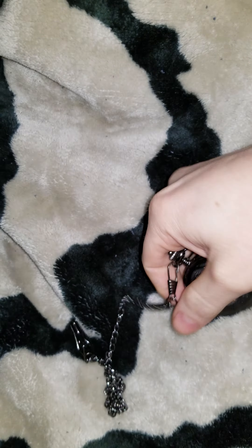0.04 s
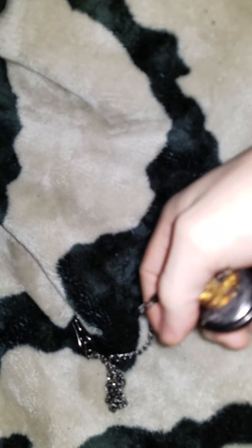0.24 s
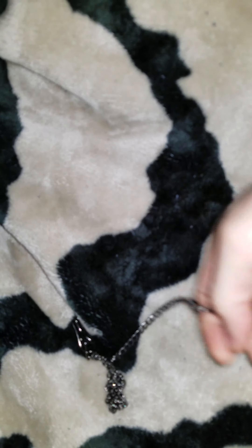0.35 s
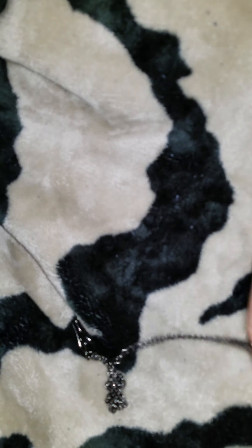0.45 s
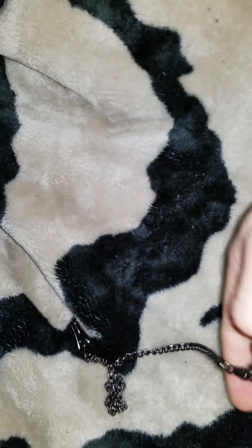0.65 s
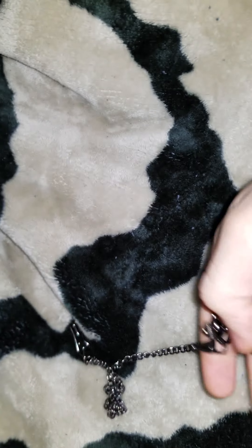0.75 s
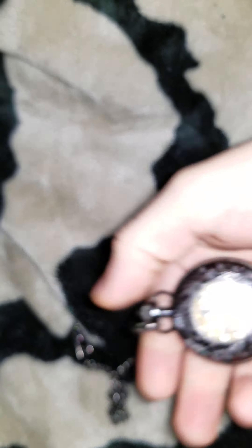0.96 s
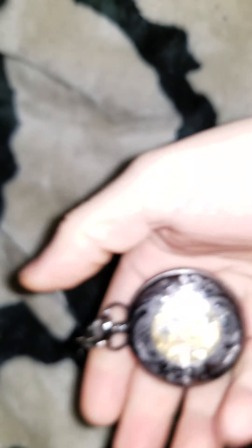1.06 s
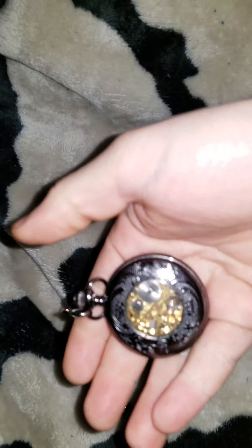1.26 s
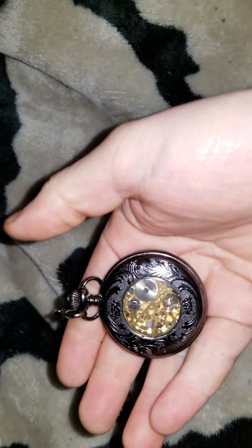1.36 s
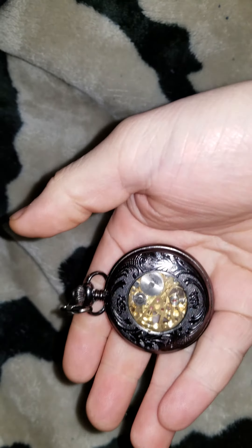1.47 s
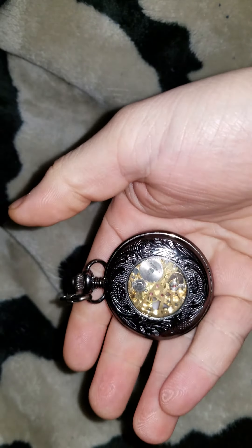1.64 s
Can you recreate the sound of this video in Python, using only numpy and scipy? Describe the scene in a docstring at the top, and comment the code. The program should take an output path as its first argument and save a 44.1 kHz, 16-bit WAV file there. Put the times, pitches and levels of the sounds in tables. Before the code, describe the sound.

Short, bright clicks of a chain against a handled pocket watch, over soft brushing and hiss.

```python
"""Over a steady hiss with faint whining tones, a hand brushes a fleece blanket, close to the microphone.
At 0.2 s it lifts a metal pocket watch with soft bumps and thuds and turns it over. Bow and chain knock
on the case in short bright clicks, the chain slides, and a small room answers. At 0.62 s one link rings
on briefly amid a flurry of clicks. After 0.8 s only the brushing and a few bumps stir over the hiss."""
import sys
import numpy as np
from scipy import signal
from scipy.fft import rfft, irfft
from scipy.io import wavfile

SR = 44100
rng = np.random.default_rng(int(sys.argv[2]) if len(sys.argv) > 2 else 0)


def to_wav(s):
    """Save 16-bit WAV."""
    ch = np.atleast_2d(s).T  # columns
    pcm = np.round(np.clip(ch, -1, 1) * 32767)  # PCM
    wavfile.write(sys.argv[1], SR, pcm.astype(np.int16))


N = 74970
T, FREQS = np.arange(N) / SR, np.fft.rfftfreq(N, 1 / SR)

# Stereo image of the noises. Each row: frequency in Hz, left-right correlation.
LIKENESS = [(30, 0), (130, 1), (300, 0.79), (700, 0.407), (1700, 0.058), (3000, 0), (4300, 0.21),
            (12000, 0)]
# Colour of the hiss. Each row: frequency in Hz, relative level in dB.
HISS_COLOUR = [(25, -8), (60, 2), (130, -1), (280, -4), (450, -14.5), (800, -19.5), (1200, -25), (1700, -9),
               (2400, -14), (2950, -14.5), (3280, -5), (3550, -7.5), (4250, 1.5), (4450, -16.5),
               (4720, -3.5), (5050, -13.5), (6000, -21), (7000, -16.5), (8400, -39), (12000, -30),
               (16000, -35)]
# Where the hiss sits. Each row: frequency in Hz, left over right in dB.
HISS_PAN = [(40, 3), (150, 2.5), (600, 8), (1200, 1.5), (2400, -7.5), (4200, -1.5), (5500, -1), (7000, 8.5),
            (12000, 0)]
# Faint whines in the hiss. Each row: pitch in Hz, level in dB.
WHINES = [(3575, -67.5), (3855, -66), (3970, -70), (4045, -83), (4080, -73.5), (4170, -68), (4206, -70),
          (4234, -71.5), (4262, -63.5), (4377, -64), (4439, -91), (4586, -68.5), (4657, -71.5), (4711, -66)]
HISS_DB, WHINE_WIDTH_HZ = -56.5, 17
HUM_HZ, HUM_DB, HUM_WIDTH_HZ = 118.7, -66.5, 16

# The hand's stroke on the fleece. Each row: time in seconds, level in dB, swish centre and width in Hz.
BRUSH_STROKE = [(0, -58, 1590, 338), (.07, -63, 1596, 300.3), (.12, -61, 1575, 326.8),
                (.165, -56, 1517, 556), (.25, -56.5, 1609, 478), (.31, -56, 1587, 403.3),
                (.37, -58.5, 1699, 399.6), (.48, -76, 1824, 258.1), (.75, -78.5, 1770, 220.2),
                (.97, -63.5, 1776, 198.1), (1.07, -65, 1747, 202.1), (1.14, -59, 1788, 240),
                (1.22, -57, 1764, 282.1), (1.32, -62, 1757, 218.8), (1.42, -70.5, 1733, 200),
                (1.58, -64, 1789, 201.4), (1.7, -72, 1794, 199)]
# The dry rub under the swish. Each row: frequency in Hz, relative level in dB.
RUSTLE_COLOUR = [(100, -7), (300, -1), (750, -3.5), (1100, -6), (1450, 3), (2200, -2), (5000, -7),
                 (8000, -32), (16000, -38)]
SWISH_WIDTH_HZ, BRUSH_REST_DB = 330, -63.5
RUSTLE_DB, RUSTLE_DB_PER_DB = -74.5, 2.4

# Soft bumps of the hand. Each row: centre in seconds, level in dB, half length in seconds.
BUMPS = [(0.199, -48.5, 0.018), (0.232, -52, 0.026), (0.316, -55, .012), (0.405, -56, 0.052),
         (0.729, -52, 0.012), (0.767, -61, .029), (.836, -56.5, 0.038), (1.648, -62.5, .018)]
# Their rumble. Each row: frequency in Hz, relative level in dB.
BUMP_COLOUR = [(20, -10), (55, 2.5), (85, -3.5), (140, -14), (300, -14.5), (800, -70.5), (4000, -78.5)]
# Thuds of hand and watch. Each row: centre in seconds, envelope level in dB, pitch in Hz.
THUDS = [(.196, -41, 61), (.309, -39, 63.1), (0.711, -45, 64), (.729, -46, 55.6)]

# Metal knocks on the case, coloured by the point of contact. Each row: start in seconds, level in dB,
# boosts in dB for low, clink, snap, bright, treble and top, then left over right in dB.
KNOCKS = [(.2408, -34.5, 13, 8, 9, 0, 3, 5, -5), (.3002, -41.5, -8, 6, 5, 1, -5, -2, -5),
          (.3064, -56, -7, -6, 4.5, -12, -4, -2, -2), (.3573, -21, 2, 6.5, 6.5, -0.5, 3, 11, 0),
          (.3801, -42, -14, 14, 7.5, -3, 5, 8, 3), (.5159, -58.5, 3, -3.5, -2, -1, 5.5, 7, 0),
          (.5549, -58.5, 0, -7, 1.5, -18, 9, -2, -8), (.5987, -48.5, 2, 3, 5.5, -2, 2, -11, -8),
          (.6176, -40.5, -21, 16.5, -7, 12, -12.5, 8, 1), (.6203, -34, -23, -11.5, 4, 1, -13.5, -5.5, -2.5),
          (.6218, -36, -27, 4, 1.5, -0.5, -4.5, 3, 3.5), (.6423, -45.5, 6.5, -4, -12, -6, -9.5, 2.5, 3.5),
          (.6483, -37.5, -1, 15, 0, 6.5, 2.5, -6.5, 7.5), (.6514, -28.5, 3.5, 0.5, -6, 2.5, 15.5, 4.5, -8),
          (.6597, -42, -8, -17, -11, -7, 11.5, 14, 0.5),
          (.6867, -55, -0.5, -2.5, -0.5, -4.5, -13.5, 0, -13.5), (.6921, -48, 1.5, -2.5, 0, -4, 2, 0, -7.5),
          (.7065, -49.5, 0, 20.5, -9, 3, 6, 8, 1), (.7167, -44, -3, 4, 8, 1, -13, 2, -0.5),
          (.7227, -51.5, 3.5, -6, 9, 4, -4, -10, 2), (.7661, -45, 3, -6, -10, 5, 7.5, 8, -2)]
# The bands of that colour, in Hz: low, clink, snap, ping, bright, treble, top.
BANDS_HZ = [2150, 2800, 4200, 5700, 7200, 11500, 14500]
# The crack of contact. Each row: frequency in Hz, gain in dB.
CRACK_COLOUR = [(150, -48), (600, -43), (1000, -32), (2500, -21.5), (4200, -33.5), (6000, -9.5), (8000, 1),
                (9300, -12.5), (10300, -0.5), (12000, -12), (16000, 0.5)]
# Modes of the hand-damped case. Each row: pitch in Hz, left and right level in dB, T60 in seconds.
CASE_MODES = [(2146, -15.4, -14.0, 0.0112), (2775, -10.9, -12.4, 0.008), (3264, -18.9, -17.0, 0.0084),
              (4137, -9.3, -8.8, 0.0079), (4848, -10.4, -7.1, 0.0091), (5716, 3.2, 8.7, 0.0089),
              (6775, -8.1, -4.6, 0.0092), (7279, 1.3, -6.2, 0.0069), (8335, -9.9, -4.9, 0.0085),
              (10670, -9.8, -15.3, 0.0097), (11216, 0.1, -4.4, 0.0083), (11625, -2.6, -5.1, 0.0084),
              (12366, 6.2, 3.4, 0.0061), (13201, -12.7, -7.1, 0.0086), (14287, -8.4, 3.3, 0.0068),
              (14679, -12.1, -2.9, 0.0082), (15445, -0.6, -8.0, 0.0072)]
ATTACK_S, CONTACT_S, CRACK_DECAY_S, CRACK_DB = .0001, .000391, .0013, 2
MODE_SCATTER_DB, GRIP_DETUNE = 3.5, .005  # blow-to-blow spread of level and of pitch (a fraction)
CASE_LOW_HZ = 1000  # the small case radiates little below this

# Colour of the room's tail. Each row: frequency in Hz, relative level in dB.
ROOM_COLOUR = [(500, 10), (1200, 17.5), (3000, 5), (6000, -14), (9000, -0.5), (12000, -3), (16000, -12.5)]
ROOM_DB, ROOM_T60_S, ROOM_DELAY_S, ROOM_BUILD_S = -14.5, .29, .0078, .0047

# The chain's slide along the case. Each row: time in seconds, tick strength in dB.
CHAIN_SLIDE = [(0, -78), (.21, -82.5), (.28, -63.5), (.35, -75.5), (.378, -49.5), (.39, -57), (.41, -63),
               (.48, -71.5), (.6, -74.5), (.67, -59.5), (.74, -78.5), (.8, -77.5), (.9, -92.5),
               (1.7, -96.5)]
# A link swings free until it lands. Each row: start in seconds, level in dB, free time in seconds.
LINK_SWINGS = [(.6206, -31, .0092)]
# The link's ring. Each row: pitch in Hz, relative level in dB, T60 in seconds.
LINK_MODES = [(5790, -12, .025), (7430, -5, .022), (12670, 0, .09)]


def from_db(db):
    """Decibels to gain."""
    return 10 ** (np.asarray(db) / 20)


def rms_one(x):
    """Scale to unit level."""
    return x / np.sqrt(np.mean(x ** 2) + 1e-20)


def in_time(rows):
    """Each column of an automation curve, sample by sample."""
    times, *columns = np.transpose(rows)
    return [np.interp(T, times, column) for column in columns]


def over_hz(points):
    """An EQ curve joined on a log frequency axis."""
    hz, value = np.transpose(points)
    return np.interp(np.log(FREQS + 1), np.log(hz), value)


def panned(pan_db):
    """Left and right gains of constant power; positive leans left."""
    gains = from_db(np.array([[.5], [-.5]]) * pan_db)
    return gains / np.sqrt(np.mean(gains ** 2, axis=0))


def decay(age, t60):
    """A fade of 60 dB every t60 seconds."""
    return np.exp(-np.log(1000) * age / t60)


def noise(gain):
    """Unit-level stereo noise of a given colour, nearly mono in the bass."""
    mid, side = rfft(rng.standard_normal((2, N)))
    alike = np.clip(over_hz(LIKENESS), -.99, .99)
    stereo = np.sqrt(1 + alike) * mid + np.sqrt(1 - alike) * side * [[1], [-1]]
    return rms_one(irfft(gain * stereo, N))


def noise_band(hz, half_width_hz):
    """A narrow band of noise, heard as a wavering tone."""
    return noise(1 / (1 + ((FREQS - hz) / half_width_hz) ** 2))


def background():
    """The bed: room hiss with a low hum and a cluster of wavering whines."""
    hiss = from_db(HISS_DB) * noise(from_db(over_hz(HISS_COLOUR)) * panned(over_hz(HISS_PAN)))
    hum = from_db(HUM_DB) * noise_band(HUM_HZ, HUM_WIDTH_HZ)
    whines = sum(from_db(db) * noise_band(hz, WHINE_WIDTH_HZ) for hz, db in WHINES)
    return hiss + hum + whines


def brush():
    """Hand on fleece: a hollow swish, over a dry rustle that grows with pressure."""
    level_db, centre_hz, width_hz = in_time(BRUSH_STROKE)
    flutter = noise_band(0, SWISH_WIDTH_HZ / 2)
    playhead = np.cumsum(width_hz / SWISH_WIDTH_HZ)  # faster flutter widens the swish
    grain = np.array([np.interp(playhead, np.arange(N), side, period=N) for side in flutter])
    swish = rms_one(grain * np.cos(2 * np.pi * np.cumsum(centre_hz) / SR))
    pressure_db = level_db - BRUSH_REST_DB
    rustle = from_db(RUSTLE_DB + RUSTLE_DB_PER_DB * pressure_db) * noise(from_db(over_hz(RUSTLE_COLOUR)))
    return from_db(level_db) * swish * panned(pan_db=-7.5) + rustle


def bumps():
    """Dull swells of handling rumble, mostly on the left."""
    swell = sum(from_db(db) * np.exp(-.5 * ((T - s) / half_s) ** 2) for s, db, half_s in BUMPS)
    return swell * noise(from_db(over_hz(BUMP_COLOUR))) * panned(pan_db=14)


def thuds(half_length_cycles=.46):
    """Hand and watch give a padded push and rebound, too damped to ring."""
    out = np.zeros(N)
    for s, db, hz in THUDS:
        cycles = (T - s) * hz
        out += from_db(db) * np.exp(-.5 * (cycles / half_length_cycles) ** 2) * np.sin(2 * np.pi * cycles)
    return out * panned(pan_db=22)


def minimum_phase(gain):
    """The tightest impulse response with this spectrum."""
    cepstrum = irfft(np.log(gain), N)
    fold = np.r_[1, np.full(N // 2 - 1, 2), np.zeros(N - N // 2)]
    return irfft(np.exp(rfft(cepstrum * fold)), N)


def knock(colour_db, size=2048):
    """One blow: a brief crack, and every case mode ringing a little differently to each side."""
    t = T[:size]
    burst = rng.standard_normal((2, size)) * (1 - np.exp(-t / ATTACK_S)) * np.exp(-t / CRACK_DECAY_S)
    crack_db = CRACK_DB + over_hz(CRACK_COLOUR) + np.interp(FREQS, BANDS_HZ, colour_db)
    crack_eq = minimum_phase(from_db(crack_db))
    out = signal.fftconvolve(burst, crack_eq[None, :size], axes=1)[:, :size]
    for hz, left_db, right_db, t60 in CASE_MODES:
        age = np.maximum(t - CONTACT_S * rng.random((2, 1)), 0)
        scatter_db = MODE_SCATTER_DB * rng.standard_normal((2, 1))
        db = np.array([[left_db], [right_db]]) + np.interp(hz, BANDS_HZ, colour_db) + scatter_db
        pitch = hz * (1 + GRIP_DETUNE * rng.standard_normal())
        envelope = (1 - np.exp(-age / ATTACK_S)) * decay(age, t60)
        out += from_db(db) * envelope * np.sin(2 * np.pi * pitch * age)
    return out


def case_knocks():
    """Bow and chain strike the case, each hit with its own weight, colour and side."""
    out = np.zeros((2, N))
    for s, db, low, clink, snap, bright, treble, top, pan_db in KNOCKS:
        hit = knock([low, clink, snap, 0, bright, treble, top])  # the ping band stays flat
        start = int(s * SR)
        out[:, start:start + hit.shape[1]] += from_db(db) * panned(pan_db) * hit
    return out


def room(x):
    """The small room answers: a diffuse tail that starts with the nearest wall."""
    age = np.maximum(T - ROOM_DELAY_S, 0)
    envelope = (1 - np.exp(-age / ROOM_BUILD_S)) * decay(age, ROOM_T60_S)
    tail = rms_one(noise(from_db(over_hz(ROOM_COLOUR))) * envelope) / np.sqrt(N)
    return from_db(ROOM_DB) * signal.fftconvolve(x, tail, axes=1)[:, :N]


def ring(ticks, hz, t60):
    """A resonator: each tick sets a fading sine ringing."""
    radius, angle = decay(1 / SR, t60), 2 * np.pi * hz / SR
    return signal.lfilter([0, np.sin(angle)], [1, -2 * radius * np.cos(angle), radius ** 2], ticks + 1e-18)


def chain(ticks_per_s=1800):
    """Sliding links set the case ringing with dense, tiny ticks."""
    ticks = (rng.random(N) < ticks_per_s / SR) * from_db(in_time(CHAIN_SLIDE)[0])
    out = np.zeros((2, N))
    for hz, left_db, right_db, t60 in CASE_MODES:
        drive = ticks * rng.standard_normal((2, N)) * from_db([[left_db], [right_db]])
        out += ring(drive, hz, t60)
    return out


def link(choke_s=.0005):
    """A loose link rings and is choked when it lands."""
    out = np.zeros((2, N))
    for s, db, free_s in LINK_SWINGS:
        age = np.maximum(T - s, 0)
        gate = (T > s) * np.exp(-np.maximum(age - free_s, 0) / choke_s)
        for hz, mode_db, t60 in LINK_MODES:
            phase = 2 * np.pi * rng.random((2, 1))
            out += gate * from_db(db + mode_db) * decay(age, t60) * np.sin(2 * np.pi * hz * age + phase)
    return out


def scene():
    """The mix: thin, bright metal with its room tail; the hand and the hiss stay dry."""
    low_cut = signal.butter(3, CASE_LOW_HZ, "high", fs=SR, output="sos")
    metal = signal.sosfilt(low_cut, case_knocks() + link() + chain())
    return metal + room(metal) + brush() + bumps() + thuds() + background()


def record(dry):
    """A steep high cut takes off the air above 16.1 kHz."""
    high_cut = signal.ellip(10, .1, 70, 16100, fs=SR, output="sos")
    return signal.sosfilt(high_cut, dry)


dry = scene()
out = record(dry)
to_wav(out)
```